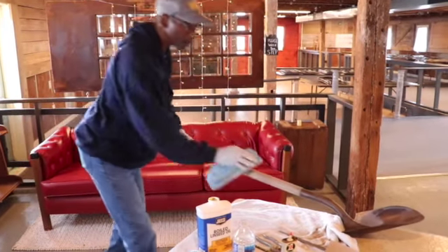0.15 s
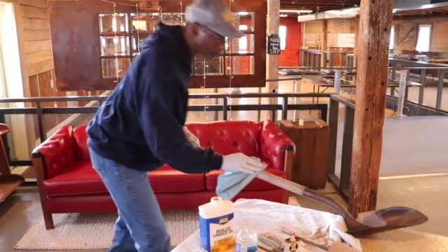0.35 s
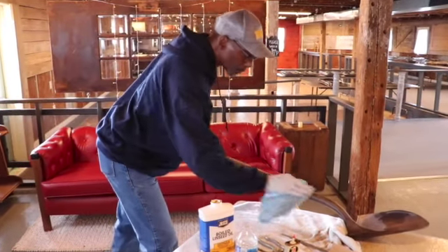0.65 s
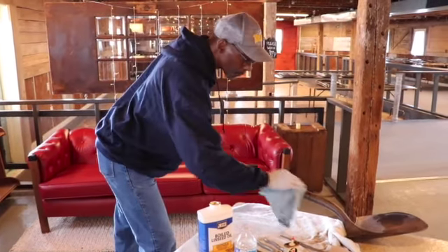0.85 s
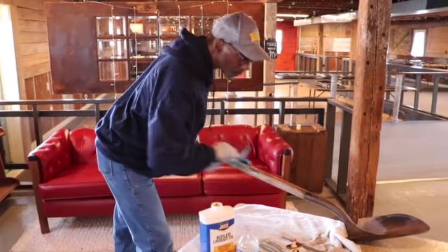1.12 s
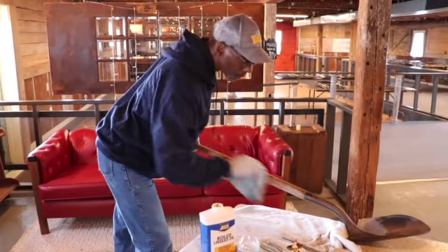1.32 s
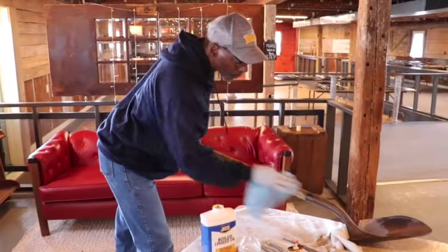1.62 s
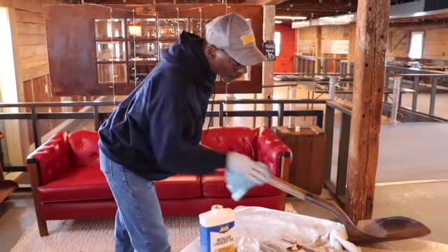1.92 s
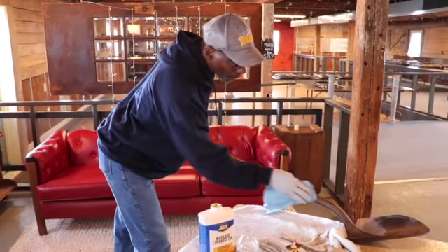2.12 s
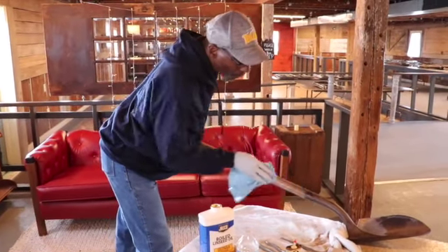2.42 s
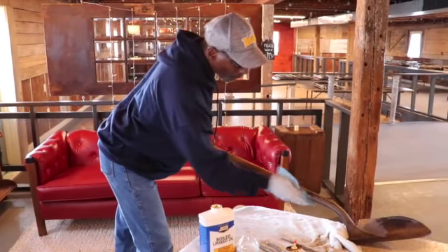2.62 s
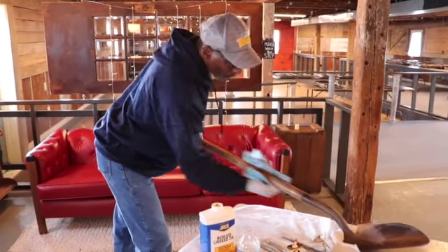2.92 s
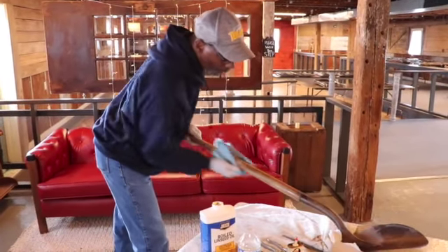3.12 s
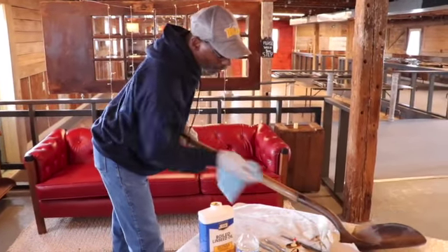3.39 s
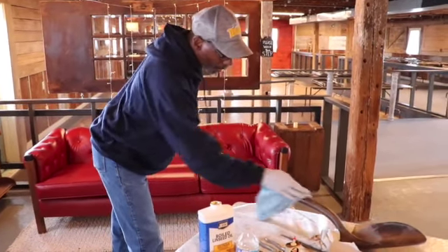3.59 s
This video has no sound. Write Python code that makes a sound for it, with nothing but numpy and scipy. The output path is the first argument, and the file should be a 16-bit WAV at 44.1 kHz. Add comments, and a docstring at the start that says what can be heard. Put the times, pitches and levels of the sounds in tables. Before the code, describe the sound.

Quick swishing cloth strokes on a wooden handle, with one low knocking groan late on.

```python
"""In a large hall with humming ventilation, an oily cloth is rubbed up and down the wooden handle of a shovel.
Dense random slips of the fibres make a hiss, louder and brighter the faster the hand moves; some rasps glide.
Once the shovel shifts: its blade judders over the table top with a low, knocking groan, made of
swinging tones, slaps and grit. A dull clunk dies away at the start, and soft thuds come between."""
import sys
import numpy as np
from scipy import signal
from scipy.fft import rfft, irfft
from scipy.io import wavfile

SR = 44100
rng = np.random.default_rng(int(sys.argv[2]) if len(sys.argv) > 2 else 0)


def materialize(psi):
    """Save the field psi as 16-bit PCM at rate SR to the path in sys.argv[1].

    A 1-D psi becomes a single channel; in a 2-D psi each row is a channel.
    """
    bounded = np.clip(np.atleast_2d(psi).T, -1, 1)
    quanta = np.round(bounded * 32767).astype(np.int16)
    wavfile.write(sys.argv[1], SR, quanta)


N = 165375
T = np.arange(N) / SR  # time in s

# how alike left and right are in the air of the hall: f/Hz, likeness/0-1
AIR_LIKENESS = [(60, 0.94), (200, 0.98), (450, 0.75), (1000, 0.34), (2500, 0), (8000, 0.01)]
SLIPS_PER_S, SLIP_SPREAD_DB = 24000, 1.5
LAG_S = 6.3e-5  # the left microphone hears shared sound this much later
HALL_T60_S, HALL_GAP_S = 0.53, 0.0063  # time to die away by 60 dB; wait before the tail
CLOTH_WET_DB, SHOVEL_WET_DB = -7, -8.5  # strength of the hall's tail


def undb(db):
    """Turn decibels into gain."""
    return 10 ** (np.asarray(db) / 20)


def unit(x):
    """Scale to an rms of 1."""
    return x / np.sqrt(np.mean(x ** 2) + 1e-20)


def at_hz(table, hz):
    """Read a table of frequencies and values, with frequency on a log axis."""
    f, value = np.array(table, float).T
    return np.interp(np.log(np.maximum(hz, 1)), np.log(f), value)


def fader(table):
    """Gain from a curve of times and decibels, silent outside it."""
    s, db = np.array(table).T
    return undb(np.interp(T, s, db)) * (T > s[0]) * (T < s[-1])


def freqs():
    """Frequency of each spectral bin in Hz."""
    return np.arange(N // 2 + 1) * SR / N


def shape(x, gain):
    """Filter by a gain for each frequency."""
    return irfft(rfft(x) * gain, N)


def colour(x, table):
    """Filter by a table of frequencies and decibels, then scale to an rms of 1."""
    return unit(shape(x, undb(at_hz(table, freqs()))))


def noise():
    """White noise: every moment is random."""
    return rng.standard_normal(N)


def walk(rate):
    """Smooth random drift with an rms of 1; little of it is faster than the rate in Hz."""
    return unit(shape(noise(), np.exp(-(freqs() / rate) ** 2)))


def swell(s, length):
    """A smooth bump with its peak at s, nearly gone one length to either side."""
    return np.exp(-2 * ((T - s) / length) ** 2)


def grains():
    """Dense tiny slips of uneven size, at random moments."""
    hit = rng.random(N) < SLIPS_PER_S / SR
    size = undb(SLIP_SPREAD_DB * np.clip(noise(), -2, 2))
    return unit(hit * noise() * size)


def pair(source, likeness):
    """Two microphones share part of a random sound; the left one hears that part later."""
    alike = np.clip(at_hz(likeness, freqs()), 0, 1)
    shared = source()
    left_lag = np.exp(-2j * np.pi * freqs() * LAG_S)
    sides = []
    for lag in (left_lag, 1):
        own = shape(source(), np.sqrt(1 - alike))
        sides.append(shape(shared, np.sqrt(alike) * lag) + own)
    return np.array(sides)


def hall(x, wet_db):
    """Add the diffuse tail of the hall: echoes so dense that they act like fading noise."""
    fade = np.exp(-np.log(1000) * T / HALL_T60_S) * (T > HALL_GAP_S)
    tail = unit(pair(noise, AIR_LIKENESS) * fade) / np.sqrt(N)
    return x + undb(wet_db) * signal.fftconvolve(np.atleast_2d(x), tail, axes=1)[:, :N]


def cloth():
    """Fibres catch and slip on the grain; hand speed and place on the handle set level and brightness."""
    # strokes: start/s, length/s, relative level/dB, speeding up/s, slowing down/s,
    # brightness/dB per octave, brightening on the way/dB per octave
    strokes = [(0.142, 0.26, -11.5, 0.28, .05, -4, 1), (0.396, 0.39, -1.8, 0.037, 0.16, 0.6, 3.5),
               (0.785, 0.49, -0.5, 0.18, 0.2, 0, 3), (1.252, 0.34, -1, 0.035, 0.053, -0.1, .5),
               (1.58, 0.33, 1.2, 0.085, 0.2, 0.8, 4.5), (1.87, 0.36, 0, 0.17, 0.096, 0, -1.5),
               (2.222, 0.23, 1.2, 0.065, 0.11, 0.2, 5), (2.453, 0.354, -2.5, 0.063, 0.092, -1.5, -3),
               (2.79, 0.38, -0.5, 0.05, 0.26, 1.5, 0), (3.068, 0.32, -6, 0.061, 0.078, 1.7, -2),
               (3.303, 0.4, 1, 0.44, 0.067, 2.06, -7), (3.695, .2, -1, 0.052, .06, 4, 9)]
    # colour of the rubbing: f/Hz, relative level/dB
    rub_colour = [(400, -17.5), (800, -7), (1100, -8.5), (1700, -1.5), (2650, 1), (3300, 0.5), (4400, -1.5),
                  (5900, -3), (7200, -4.5), (9800, -6.5), (12000, -12.5), (15500, -22.5)]
    # the cloth snags on the grain: middle t/s, length/s, level/dB
    snag_times = [(0.684, 0.015, -42), (1.51, 0.045, -47), (2.71, 0.074, -41.5)]
    # how alike left and right are: f/Hz, likeness/0-1
    cloth_likeness = [(400, 0.35), (1000, 0.78), (2200, 0.92), (3000, .8), (5000, 0.23), (9000, 0.23),
                      (14000, 0.27)]
    # lean to one side: f/Hz, left minus right/dB
    cloth_pan = [(500, 2), (2200, -3), (4800, 3.5), (6500, -2.5), (8500, -3.8), (13000, -2)]
    level_db, speed_law = -37.5, 0.61  # loudness grows as speed ** law
    speed_tilt_db, base_tilt_db = 4.6, 0.22  # brightness, dB per octave
    grip_db, grip_hz, patchy_db, patchy_hz = 0.5, 62, -0.16, 19  # random flicker

    power_sum, tilt = np.zeros(N), np.zeros(N)
    for start, length, db, rise, fall, bright_db, drift_db in strokes:
        # the hand speeds up, holds and slows to the turn
        ramps = np.clip([(T - start) / rise, (start + length - T) / fall], 0, 1)
        speed = np.sin(np.pi / 2 * ramps).prod(axis=0)
        place = np.clip((T - start) / length, 0, 1) - 0.5
        power = (undb(db) * speed ** speed_law) ** 2
        stroke_tilt = bright_db + drift_db * place + base_tilt_db + speed_tilt_db * (speed - 1)
        power_sum += power
        tilt += power * stroke_tilt
    tilt /= power_sum + 1e-12  # the stronger stroke decides

    fibres = colour(pair(grains, cloth_likeness), rub_colour)
    # five overlapping octave bands, tilted around 3500 Hz
    octave = np.clip(np.log2(np.maximum(freqs(), 1) / 3500), -2, 2)
    rub = 0
    for k in range(-2, 3):
        band = shape(fibres, np.maximum(1 - abs(octave - k), 0))
        rub = rub + band * undb(k * tilt + patchy_db * walk(patchy_hz))
    rub = rub * np.sqrt(power_sum) * undb(level_db + grip_db * walk(grip_hz))

    snag_colour = [(1000, -20), (3800, -5), (6000, -4), (15000, -11)]  # f/Hz, relative level/dB
    snags = colour(pair(grains, cloth_likeness), snag_colour)
    rub = rub + snags * sum(undb(db) * swell(s, length) for s, length, db in snag_times)
    pan_db = at_hz(cloth_pan, freqs())
    return shape(hall(rub, CLOTH_WET_DB), undb(np.array([pan_db, -pan_db]) / 2))


def rasps():
    """Friction noise in one broad resonance that glides as the hand moves along the handle."""
    # hollow notes of the rasping cloth: middle t/s, length/s, middle f/Hz, glide/Hz per s, level/dB
    rasp_notes = [(0.909, .09, 2200, 3502, -47), (1.645, 0.069, 2550, 3000, -41.5),
                  (1.718, .06, 3190, 6000, -44.5), (2.03, 0.22, 2750, 500, -46),
                  (2.308, 0.075, 2586, 5000, -43), (2.72, .06, 2790, 0, -44), (3.61, 0.15, 4100, 0, -46.5)]
    width_hz = 640
    likeness = [(100, 0.5), (2000, 0.55)]  # f/Hz, likeness/0-1
    below = np.exp(-(freqs() / width_hz) ** 2)
    # two slow noises, moved up to the gliding note
    inphase, across = (unit(shape(pair(noise, likeness), below)) for _ in range(2))
    out = 0
    for s, length, hz, glide, db in rasp_notes:
        since = T - s
        phase = 2 * np.pi * (hz * since + glide * since ** 2 / 2)
        rasp = inphase * np.cos(phase) + across * np.sin(phase)
        out = out + undb(db) * swell(s, length) * rasp
    return hall(out, CLOTH_WET_DB)


def ring(x):
    """Pass a force through the resonances of shovel and table, where certain notes ring on."""
    # resonances: f/Hz, width/Hz, relative level/dB
    resonances = [(162, 14, -7), (171.3, 14, 7.5), (244, 31, 2), (343, 9.7, 7.5), (456.5, 12, 2.5),
                  (498.6, 10, 3), (629, 17, -1), (670, 21, -5), (732.5, 18, -3), (772, 15, -2),
                  (906, 23, -9.5), (1083, 71, -10.5), (1700, 17, -8.5), (2130, 37, -16), (2500, 44, -14),
                  (3403, 82, -12.5)]
    out = 0
    for hz, width, db in resonances:
        b, a = signal.iirpeak(hz, hz / width, fs=SR)
        out = out + undb(db) * signal.lfilter(b, a, x)
    return out


def shovel():
    """The blade sticks and slips: it swings, sings an octave up, slaps once a cycle and grinds over grit."""
    # rate of sticking and slipping: t/s, mean f/Hz
    slip_rate = [(2.80, 205.5), (2.86, 233.9), (2.908, 244), (2.95, 231.7), (3.001, 228), (3.04, 246.5),
                 (3.071, 253.4), (3.12, 252)]
    # strength of the judder: t/s, relative level/dB
    swing_curve = [(2.795, -30), (2.808, -7), (2.825, -19.5), (2.865, -1.5), (2.908, 2.5), (2.917, -19),
                   (2.925, -14), (2.936, -2), (2.985, -7), (3.02, -6.5), (3.038, -11), (3.062, 3),
                   (3.074, -19), (3.095, -2), (3.125, -30)]
    # strength of the singing an octave higher: t/s, relative level/dB
    sing_curve = [(2.84, -20), (2.88, -11.5), (2.955, -4.5), (2.985, 0), (3.02, -2), (3.05, -0.5),
                  (3.075, -3), (3.11, 0.5), (3.13, -20)]
    # pressing on the grit under the blade: t/s, relative level/dB
    press_curve = [(2.80, -11), (2.845, -5), (2.875, 4), (2.90, -2.5), (2.93, 0.5), (2.99, 2.5), (3.03, 1),
                   (3.07, -6), (3.13, -11.5)]
    # colour of the grit: f/Hz, relative level/dB
    grit_colour = [(100, -16), (200, -2), (700, 0), (1200, 3), (1700, -4), (2700, -6), (3600, -13),
                   (5000, -31), (12000, -14.5), (15500, -40)]
    jitter, jitter_hz, spread_db = 0.03, 70, 1.5  # uneven rate (share of it), and uneven level
    swing_db, sing_db, slap_db, ground_db, grit_db = -23.5, -29, -38, -31.5, -35.5

    times, rates = np.array(slip_rate).T
    rate = np.interp(T, times, rates) * (1 + jitter * walk(jitter_hz))
    turns = np.cumsum(rate) / SR  # cycles so far
    swing_gain = fader(swing_curve) * undb(swing_db + spread_db * walk(46))
    swing = swing_gain * np.sin(2 * np.pi * turns)
    sing_gain = fader(sing_curve) * undb(sing_db + spread_db * walk(60))
    sing = sing_gain * np.sin(2 * np.pi * 2 * turns)

    press = fader(press_curve)
    strength = np.sqrt(np.mean(press ** 2))
    # one click of uneven size for each full cycle
    clicks = np.diff(np.floor(turns), prepend=0) * undb(4.2 * np.clip(noise(), -2, 2))
    slaps = unit(ring(clicks * press)) * strength * undb(slap_db)
    ground = unit(ring(grains() * press)) * strength * undb(ground_db)
    grit = colour(pair(grains, AIR_LIKENESS), grit_colour) * press * undb(grit_db)
    no_bass = signal.butter(3, 125, "high", fs=SR, output="sos")
    rough = signal.sosfilt(no_bass, slaps + ground + grit)
    return hall(np.sqrt(2) * (swing + sing) + rough, SHOVEL_WET_DB)


def thuds():
    """Soft low thuds as the worker's weight shifts: bass noise in short bumps."""
    # dull thuds: middle t/s, length/s, level/dB
    thud_times = [(1.174, 0.077, -48), (2.204, 0.15, -46), (2.896, .06, -41), (3.05, 0.05, -48),
                  (3.716, .07, -45)]
    # their colour: f/Hz, relative level/dB
    thud_colour = [(25, -20), (55, 0), (90, 8), (130, 4), (250, -28)]
    bumps = sum(undb(db) * swell(s, length) for s, length, db in thud_times)
    return colour(noise(), thud_colour) * bumps


def clunk():
    """A dull clunk at the start: low noise that holds for a moment, then dies away evenly in dB."""
    # colour of the clunk: f/Hz, relative level/dB
    clunk_colour = [(60, -12), (130, 3), (230, 4), (350, 3), (700, 1.5), (1100, -6.5), (2500, -28),
                    (8000, -30)]
    hold_s, level_db, t60_s = 0.013, -39.5, 0.49
    after = np.maximum(T - hold_s, 0)
    fade = np.exp(-np.log(1000) * after / t60_s)
    return colour(pair(noise, AIR_LIKENESS), clunk_colour) * undb(level_db) * fade


def tone(hz, wobble_hz, rate):
    """A sine of rms 1 whose pitch wavers at random."""
    return np.sqrt(2) * np.sin(2 * np.pi * np.cumsum(hz + wobble_hz * walk(rate)) / SR)


def ventilation():
    """A nearly steady rush of air, made of noise, with a few wavering fan tones."""
    # colour of the rush: f/Hz, relative level/dB
    air_colour = [(22, -20), (35, -5.5), (55, -3), (100, 1), (135, -1.5), (210, -4.5), (310, -5), (400, -2),
                  (480, -1.5), (580, -3.5), (780, -6), (1050, -11), (1800, -12.5), (3500, -18),
                  (6000, -21.5), (10000, -24.5), (15500, -39)]
    # fan tones: mean f/Hz, mean level/dB ahead of the slight lean to the right
    fan_tones = [(80.7, -62), (296, -59), (468, -56), (5044, -77), (7682, -77), (8403, -69)]
    air_db, waver_db = -42.5, 0.67
    pan_db = -1.04  # left minus right
    rush = colour(pair(noise, AIR_LIKENESS), air_colour) * undb(air_db + waver_db * walk(19.5))
    tones = sum(undb(db + 2 * walk(21)) * tone(hz, wobble_hz=4.31, rate=14.2) for hz, db in fan_tones)
    return (rush + tones) * undb(np.array([[pan_db], [-pan_db]]) / 2)


def scene():
    """Cloth, shovel and worker in the humming hall."""
    return cloth() + rasps() + shovel() + thuds() + clunk() + ventilation()


def record(dry):
    """The recorder steeply cuts the treble above 15720 Hz."""
    low_pass = signal.ellip(10, 0.2, 80, 15720, fs=SR, output="sos")
    return signal.sosfilt(low_pass, dry)


dry = scene()
out = record(dry)
materialize(out)
```